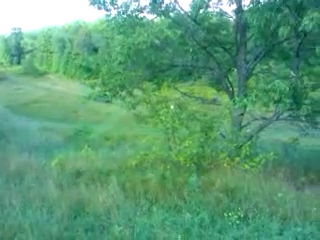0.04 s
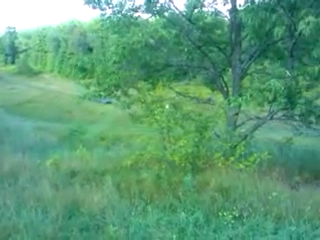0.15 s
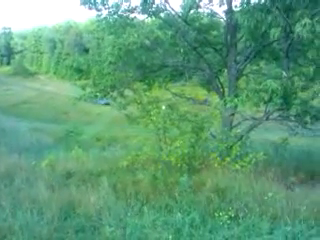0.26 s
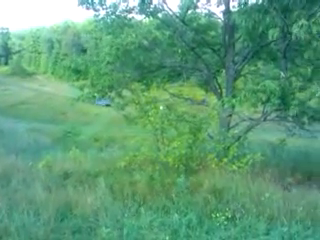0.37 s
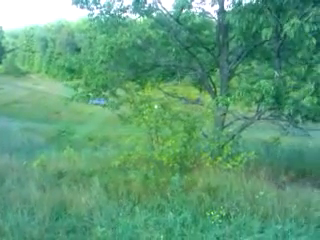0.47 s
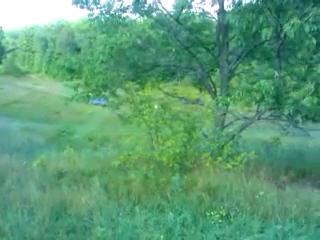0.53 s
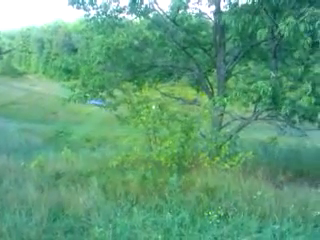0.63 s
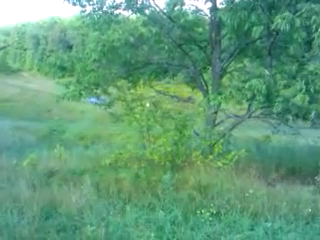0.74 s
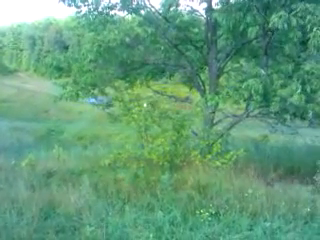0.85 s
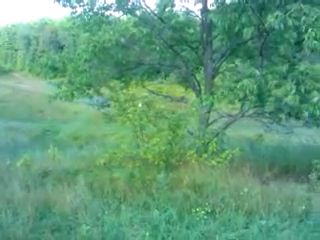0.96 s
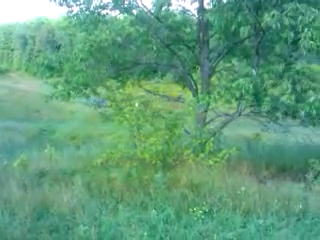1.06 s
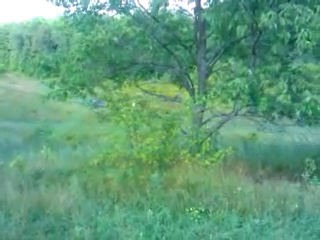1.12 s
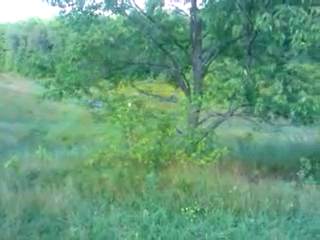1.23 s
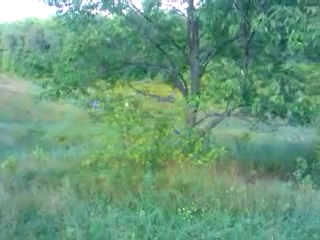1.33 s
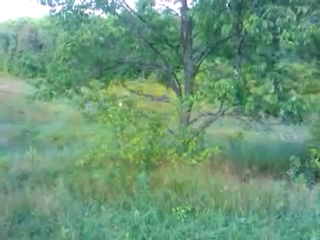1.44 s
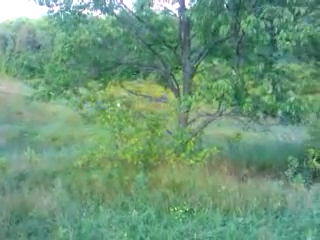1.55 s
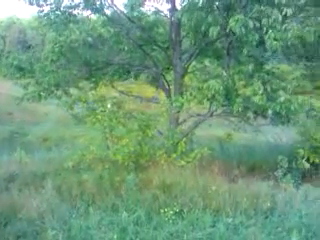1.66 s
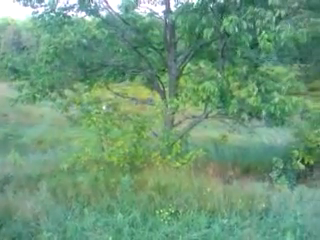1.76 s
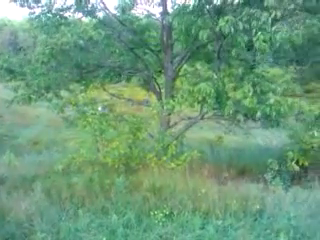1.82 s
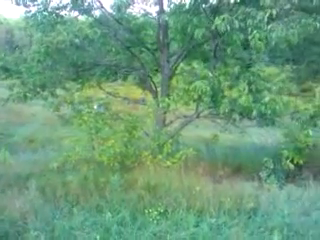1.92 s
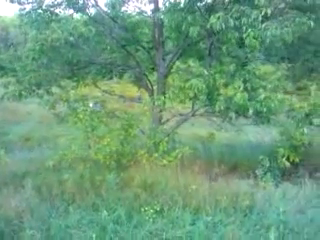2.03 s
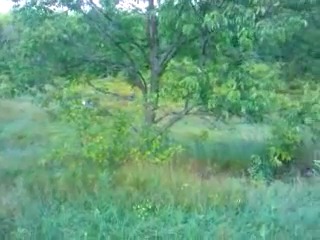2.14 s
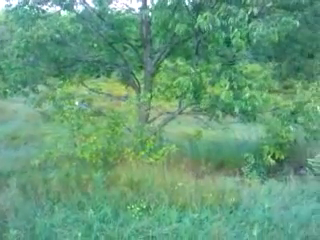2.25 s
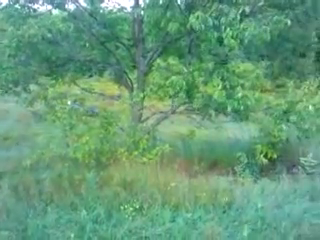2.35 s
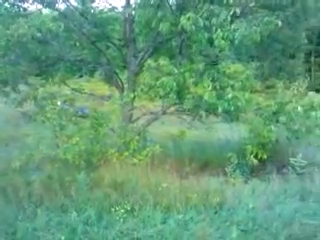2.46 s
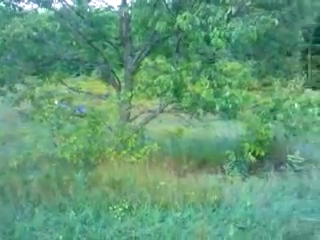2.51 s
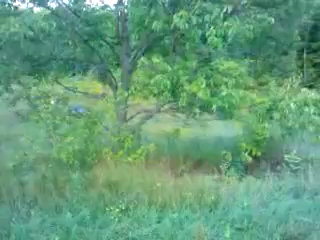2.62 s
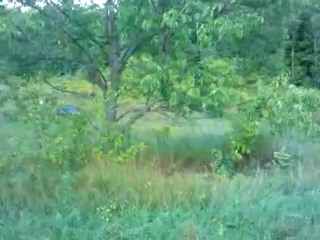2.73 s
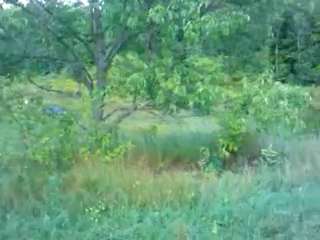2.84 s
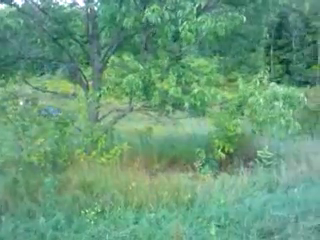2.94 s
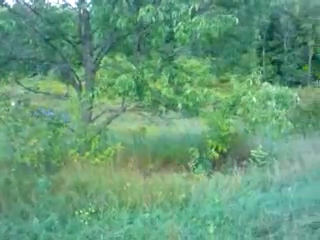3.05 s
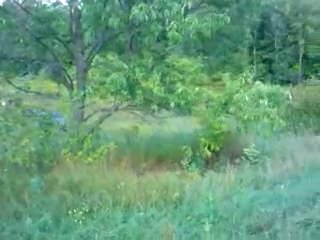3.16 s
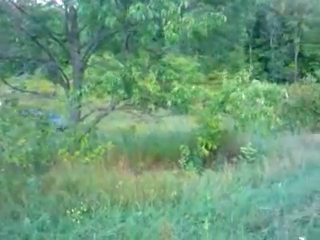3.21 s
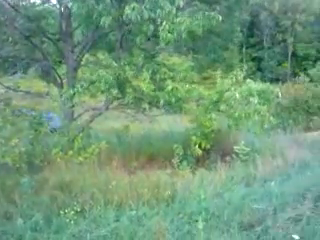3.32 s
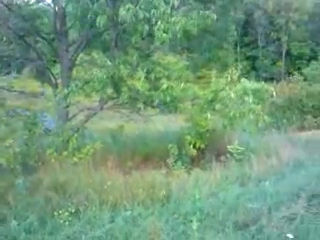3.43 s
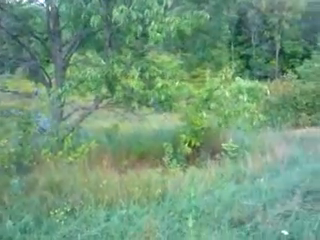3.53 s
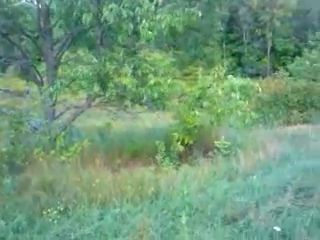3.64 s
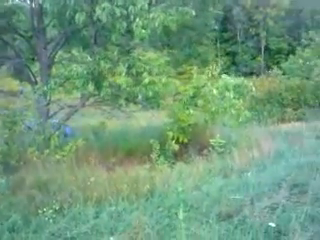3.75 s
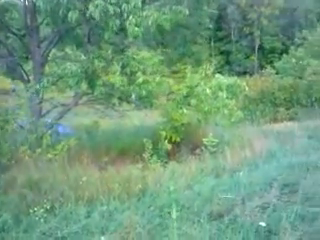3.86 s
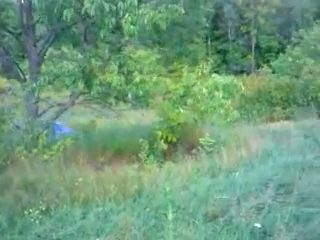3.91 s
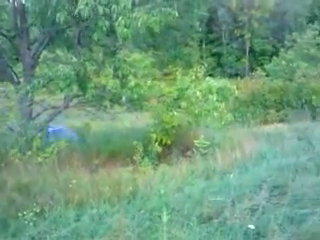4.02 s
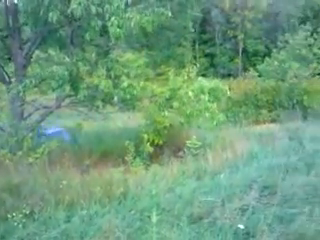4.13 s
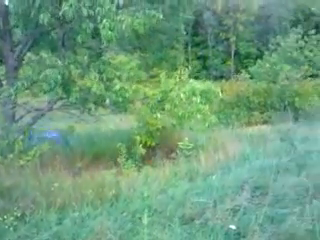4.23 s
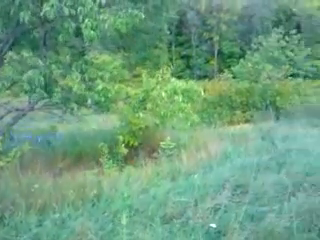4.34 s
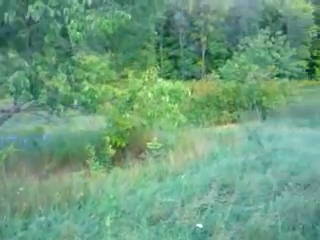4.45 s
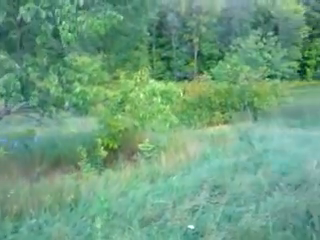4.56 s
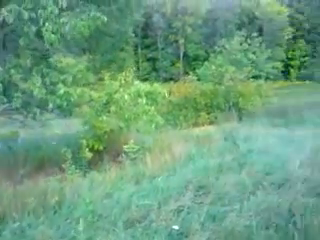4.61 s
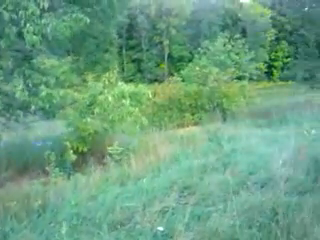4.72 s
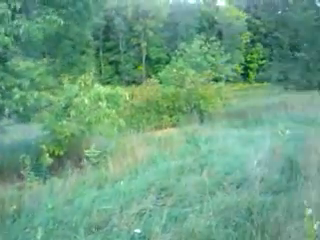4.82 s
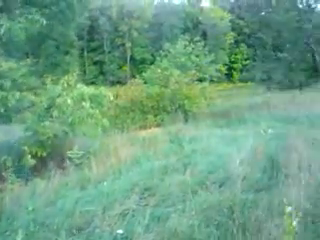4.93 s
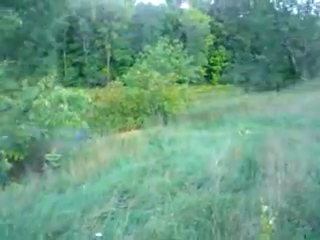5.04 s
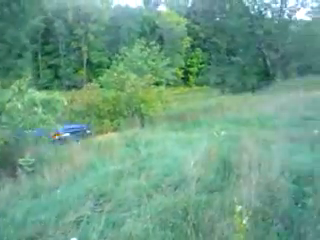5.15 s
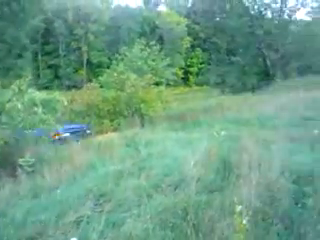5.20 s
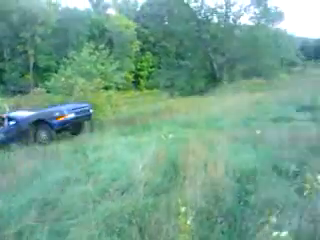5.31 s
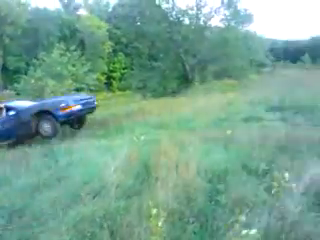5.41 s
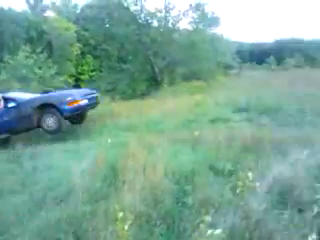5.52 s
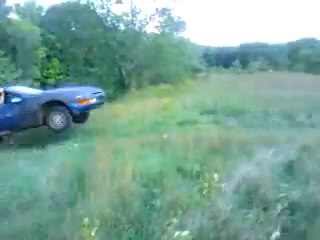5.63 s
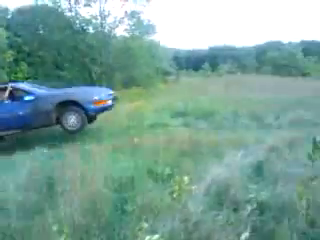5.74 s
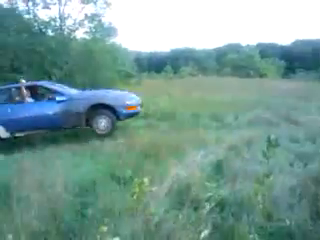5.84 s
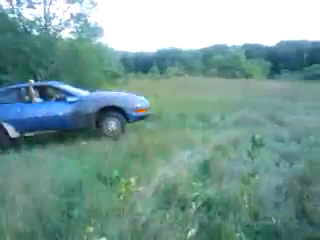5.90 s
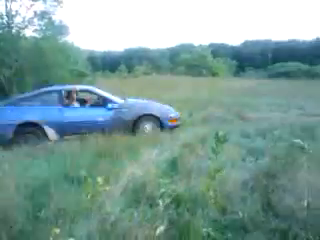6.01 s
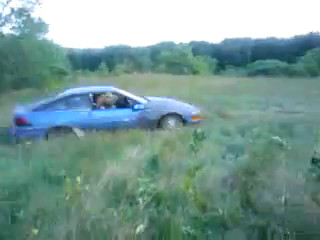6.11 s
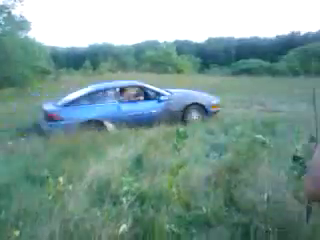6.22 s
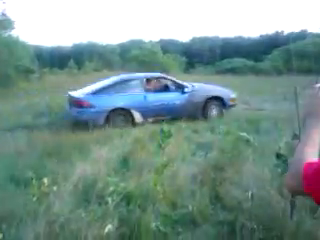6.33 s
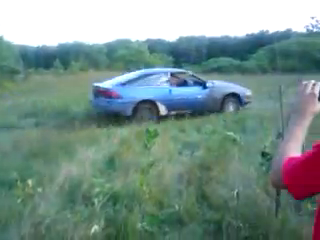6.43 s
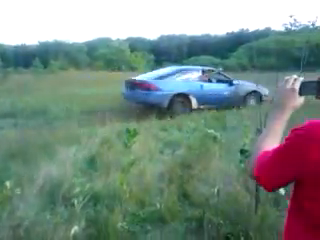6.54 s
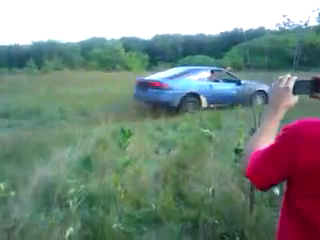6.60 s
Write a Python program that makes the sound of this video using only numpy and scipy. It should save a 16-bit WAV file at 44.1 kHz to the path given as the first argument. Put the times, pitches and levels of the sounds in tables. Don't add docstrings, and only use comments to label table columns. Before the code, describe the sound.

A small leaky-exhaust car revs far off across a windy field, lifts briefly, then roars past close, rasping and crackling until the microphone clips.

```python
import sys
import numpy as np
from scipy import signal
from scipy.io import wavfile
from scipy.ndimage import uniform_filter1d

SR = 44100
rng = np.random.default_rng(int(sys.argv[2]) if len(sys.argv) > 2 else 0)


def boost(x):
    u = np.asarray(x, float) / 20
    return 10 ** u


def output_pcm(signal):
    pcm = np.clip(np.atleast_2d(signal).T, -1, 1) * 32767
    wavfile.write(sys.argv[1], SR, np.round(pcm).astype(np.int16))


N = 294096

# press in seconds, lift in seconds.
PEDAL_PUSHES = [
    (1.81, 2.027),
    (2.085, 2.165),
    (2.472, 3.915),
    (4.13, 6.7),
]
# time in seconds, twice the firing rate in Hz.
ENGINE_SPEED = [(1.75, 165), (1.95, 190), (3.1, 188), (3.88, 214), (4.15, 202), (4.27, 232), (4.42, 216),
                (4.6, 232), (4.73, 215), (4.86, 230), (5.2, 248), (5.5, 211), (5.85, 332), (6.04, 374),
                (6.1, 359), (6.29, 344), (6.42, 266), (6.67, 302)]
CYLINDER_LEVELS = [-3, 1.5, -1.4, -1.5]
# time in seconds, exhaust rasp at full throttle in dB.
NEARNESS = [(1.4, -34.5), (1.88, -22.5), (2.02, -32.5), (2.15, -24.5), (2.6, -21.5), (3.2, -24.5),
            (3.8, -20), (4.2, -22), (4.44, -20.5), (4.8, -28), (5.17, -14), (5.45, -12.5), (5.67, -5),
            (6.0, -4), (6.07, -13), (6.27, -13), (6.44, -23.5), (6.67, -33.5)]
# frequency in Hz, level in dB per Hz.
RASP_SPECTRUM = [(530, -46), (900, -26), (1150, -17), (1400, -8), (1570, -5), (1850, -5), (2150, -3.5),
                 (2430, -4.5), (2650, -12), (3300, -16.5), (3700, -28.5), (4100, -59), (4500, -39.5),
                 (5850, -80), (9900, -120)]
# frequency in Hz, level in dB per Hz.
ROAR_SPECTRUM = [(94, -46.5), (160, -15.5), (194, -13.5), (238, -9), (753, -3), (892, -11.5), (1100, -5),
                 (1430, 0.5), (2420, -120)]
# time in seconds, level added to the roar in dB.
TAILPIPE_FACING = [(1.41, 8.5), (1.5, 2), (1.7, -4.5), (2.0, 3.5), (2.3, -3.5), (2.6, -3), (3.1, 1),
                   (4.4, -2), (5.12, 3), (5.4, 0), (5.7, 1.5), (6.06, 0.5), (6.1, 13), (6.25, 5.5),
                   (6.45, 12.5), (6.67, 11.5)]
# time in seconds, top resonance in Hz, its level in dB,
# low flank in dB, tilt in dB per octave.
GROUND_PATH = [(0, 3230, 1, 9, 7), (1.7, 3190, 0, 0.5, -8), (2.12, 2900, 1.5, 2.5, -3.5),
               (2.6, 2860, -5.5, 2, -7.5), (2.9, 2960, 7.5, 1.5, -9), (3.2, 3160, 5.5, 8.5, -2.5),
               (3.9, 3235, 5, -2, -8), (4.6, 3140, 5.5, -7, -3.5), (5.1, 3270, 0.5, -2, 2),
               (5.4, 3164, 7, -7, -6.5), (5.9, 3400, 8.5, 7.5, -1.5), (6.2, 2875, 3, 5.5, -3),
               (6.67, 2650, 8.5, 8, -6.5)]
# time in seconds, level in dB.
FAR_DRONE = [(0, -66), (.55, -64), (.8, -68.5), (1.4, -63.5), (1.5, -75.5), (6.67, -93)]
# multiple of firing rate, level in dB.
FAR_ORDERS = [(3, 0), (4, -2), (5, -6.5), (6, 0), (7, -0.5), (8, -4.5)]
# multiple of firing rate, level in dB.
BETWEEN_ORDERS = [(1.5, -6), (1.75, 0), (2.25, -14)]
# start in seconds, end in seconds, level in dB.
PIPE_BOOMS = [(2.7, 2.78, -55), (3.02, 3.45, -52), (3.45, 3.9, -50), (4.15, 4.35, -44.5),
              (4.21, 4.3, -39.5), (4.43, 4.76, -42), (4.53, 4.65, -42.5), (4.75, 5.03, -34),
              (5.215, 5.58, -31.5), (5.63, 5.72, -29.5), (5.78, 5.92, -35.5), (6.06, 6.18, -27),
              (6.19, 6.35, -19), (6.47, 6.65, -30)]
# start in seconds, end in seconds, level in dB.
TOP_REV_HOWL = [
    (5.792, 6.086, -23),
]
# start in seconds, end in seconds, level in dB.
TAIL_THROB = [
    (6.066, 6.174, -29),
    (6.159, 6.286, -21.5),
    (6.465, 6.66, -41),
]
# time in seconds, rumble in dB.
LOW_RUMBLE = [(0, -50), (.45, -50.5), (1.6, -59.5), (2.6, -55.5), (4.3, -48), (5.14, -47.5), (5.3, -37.5),
              (6.08, -44.5), (6.67, -45)]
# start in seconds, end in seconds, level in dB.
RUMBLE_SWELLS = [
    (4.91, 4.95, -45),
    (5.3, 5.32, -36),
    (5.45, 5.49, -32.5),
    (5.63, 5.68, -32),
    (6.13, 6.37, -37),
]
# frequency in Hz, level in dB per Hz.
FIELD_SPECTRUM = [(290, -30), (500, -9.5), (965, -7), (1250, 6.5), (2090, 0), (2820, -13.5), (3370, -8.5),
                  (4300, -39), (5590, -66), (9460, -120)]
# start in seconds, end in seconds, level in dB.
WIND_FLUTTER = [
    (.04, .07, -43.5),
    (.115, .15, -43),
    (.18, .32, -52.5),
    (.33, .56, -43),
    (.63, .7, -46),
    (.72, .8, -59),
]
# time in seconds, peak in dB, frequency in Hz.
PORT_PUFFS = [(0.057, -38, 310), (0.129, -35.5, 400), (0.162, -44, 219), (0.225, -41, 270),
              (0.293, -42, 335), (0.355, -41, 280), (0.374, -38, 406), (0.405, -29, 310), (0.432, -33, 310),
              (0.443, -31.5, 307), (0.477, -36, 361), (0.489, -40, 316), (0.54, -32, 305),
              (0.638, -37.5, 253), (0.666, -39, 270), (0.698, -44, 250), (1.055, -27, 290),
              (1.716, -47.5, 285), (1.747, -43, 244), (1.822, -37, 295)]
# time in seconds, peak in dB, frequency in Hz.
SHORT_BANGS = [(1.8233, -23, 1610), (1.8944, -11, 2020), (1.9351, -13, 2050), (2.1111, -19, 2540),
               (2.4857, -20, 2060), (2.5088, -19, 1320), (2.5301, -8.5, 2100), (2.5531, -13, 1980),
               (2.5745, -8, 1930), (2.5955, -8, 2090), (2.6379, -7.5, 2150), (2.6838, -10, 1850),
               (2.7227, -4.5, 2140), (2.7444, -10, 1830), (2.7776, -7.5, 1840), (2.8524, -6.5, 1980),
               (2.8949, -11, 2050), (2.9813, -9.5, 1830), (3.021, -10.5, 1570), (3.1911, -12, 1580),
               (3.356, -10.5, 1920), (3.3992, -8.5, 2370), (3.8594, -14, 2400), (4.1435, -22, 2240),
               (4.1747, -23, 1580), (4.4004, 0, 2180), (4.5086, -8.5, 2180), (4.5444, -5, 2180),
               (4.5625, -6.5, 1570), (4.7222, -13, 1680),
               (5.035, -7, 2390), (5.264, 0, 1592), (5.2804, 0.5, 1576), (5.3674, -9, 2130),
               (5.424, 1.5, 2350), (5.432, 1.5, 1716), (5.4493, 0.5, 2294), (5.4861, -4.5, 1510),
               (5.5098, -2, 1503), (5.517, -2.5, 1740), (5.5336, -2.5, 1707), (5.5519, 3, 1780),
               (6.0408, -10, 2004), (6.061, 3.5, 1564), (6.093, 0.5, 1520), (6.1126, 1, 2050),
               (6.128, -3.5, 2022), (6.159, -2, 1396), (6.1951, -3, 1930), (6.204, -2, 1426),
               (6.224, 0.5, 1360), (6.251, -2, 1890), (6.267, -7.5, 1890), (6.2957, 1.5, 1793),
               (6.398, -4.5, 1870)]


def rms_one(x):
    return x / np.sqrt(np.mean(x ** 2) + 1e-20)


def in_time(rows):
    seconds, *columns = np.transpose(rows)
    return [np.interp(np.arange(N) / SR, seconds, column) for column in columns]


def held(rows, rise_s, fall_s):
    t = np.arange(N) / SR
    total = 0
    for start, end, db in rows:
        rising = (t - start) / rise_s
        falling = 1 + (end - t) / fall_s
        total = total + boost(db) * np.clip(np.minimum(rising, falling), 0, 1)
    return total


def drift(rate):
    r = np.exp(-80 * np.pi * rate / SR)
    slow = signal.lfilter([1], [1, -2 * r, r * r], rng.standard_normal(N // 40 + 2002))[2000:]
    return np.interp(np.arange(N) / 40, np.arange(len(slow)), rms_one(slow))


def coloured(gate, spectrum, octaves, patchy_db, patch_rate, path=lambda hz: 0):
    hz, level_db = np.transpose(spectrum)
    edges = hz[1] * .8 * 2 ** np.arange(0, np.log2(hz[-2] / hz[1]), octaves)
    white = gate * rng.standard_normal((2, N))
    out = 0
    for k, (low, high) in enumerate(zip(edges, edges[1:])):
        sos = signal.butter(2, [low, high], "band", fs=SR, output="sos")
        band = signal.sosfilt(sos, white[k % 2])
        mid = np.sqrt(low * high)
        level = np.interp(np.log(mid), np.log(hz), level_db)
        out = out + band * boost(level + path(mid) + patchy_db * drift(patch_rate))
    return rms_one(out)


def lumpy(low_hz, high_hz, lump_db, rate):
    noise = boost(lump_db * drift(rate)) * rng.standard_normal(N)
    return rms_one(signal.sosfilt(signal.butter(3, [low_hz, high_hz], "band", fs=SR, output="sos"), noise))


def damped_bursts(events, rise_s, fall_s, trim_db):
    out, t = np.zeros(N + 2000), np.arange(2000) / SR
    shape = (1 - np.exp(-t / rise_s)) * np.exp(-t / fall_s)
    shape = shape / shape.max()
    for s, db, hz in events:
        at = round(s * SR)
        out[at:at + 2000] += boost(db + trim_db) * shape * np.sin(2 * np.pi * (hz * t + rng.random()))
    return out[:N]


def pedal():
    return np.minimum(held([(*push, 0) for push in PEDAL_PUSHES], rise_s=.06, fall_s=.1), 1)


def engine_turns():
    firing_hz = in_time(ENGINE_SPEED)[0] / 2
    return np.cumsum(firing_hz * (1 + .004 * drift(12))) / SR


def firing_gate(turns, share):
    decay_s, uneven_db = .0038, 2.5
    count = np.floor(turns).astype(int)
    luck = rng.standard_normal(2000)[count]
    cylinder_db = np.array(CYLINDER_LEVELS)[count % 4]
    kicks = np.append(0, np.diff(count)) * boost(cylinder_db + uneven_db * luck)
    gas = signal.lfilter([1], [1, -np.exp(-1 / (decay_s * SR))], kicks)
    gas = gas / np.sqrt(uniform_filter1d(gas ** 2, size=4000) + 1e-9)
    share = np.clip(share, 0, 1)
    return np.sqrt(share * gas ** 2 + 1 - share)


def ground_path(top_hz, top_db, flank_db, tilt_db):
    top, width = np.log2(top_hz), .09

    def gain_db(hz):
        resonance = top_db * np.exp(-((np.log2(hz) - top) / width) ** 2)
        return resonance + flank_db * (hz < 1300) + tilt_db * np.log2(hz / 1900)
    return gain_db


def exhaust(throttle, turns):
    lift_drop_db, surge_db = 20, .88
    coast_share, load_share = .1, .45
    clear_below_db, blurred_at_db = -19, -12
    roar_coast_db, roar_load_db = -9.5, -17

    near_db, = in_time(NEARNESS)
    rasp_db = near_db - lift_drop_db * (1 - throttle) + surge_db * drift(11.4)
    nearest_db = np.maximum.accumulate(near_db)
    clear = np.clip((nearest_db - blurred_at_db) / (clear_below_db - blurred_at_db), 0, 1)
    gate = firing_gate(turns, coast_share + load_share * throttle * clear)

    path = ground_path(*in_time(GROUND_PATH))
    rasp = coloured(gate, RASP_SPECTRUM, octaves=.11, patchy_db=3.2, patch_rate=6, path=path)
    rasp = rasp / np.sqrt(uniform_filter1d(rasp ** 2, size=3000))

    roar_db = roar_coast_db + (roar_load_db - roar_coast_db) * throttle + in_time(TAILPIPE_FACING)[0]
    roar = coloured(np.sqrt(gate), ROAR_SPECTRUM, octaves=.2, patchy_db=2.5, patch_rate=11)
    return boost(rasp_db) * (rasp + boost(roar_db) * roar)


def orders(turns, table, wobble_db):
    total = 0
    for multiple, db in table:
        tone = np.sin(2 * np.pi * (multiple * turns + rng.random()))
        total = total + np.sqrt(2) * boost(db + wobble_db * drift(17)) * tone
    return total


def pipe_tones(turns):
    boom, howl, throb = (held(rows, rise_s=.042, fall_s=.05) for rows in (PIPE_BOOMS, TOP_REV_HOWL, TAIL_THROB))
    families = [
        (boost(in_time(FAR_DRONE)[0]), FAR_ORDERS),
        (boom, [(2, 0)]),
        (boost(-14.5) * boom + throb, BETWEEN_ORDERS),
        (boost(-13) * boom, [(3, 0), (5, 0)]),
        (boost(-19) * boom + howl, [(4, 0)]),
    ]
    return sum(gain * orders(turns, family, wobble_db=1.6) for gain, family in families)


def low_rumble(throttle):
    lift_drop_db = 16
    shake = boost(in_time(LOW_RUMBLE)[0] - lift_drop_db * (1 - throttle))
    shake = shake + held(RUMBLE_SWELLS, rise_s=.079, fall_s=.045)
    return shake * lumpy(63, 170, lump_db=2, rate=9.9)


def field_hush():
    return boost(-50) * coloured(1, FIELD_SPECTRUM, octaves=.21, patchy_db=2.6, patch_rate=9)


def wind_on_microphone():
    flutter = held(WIND_FLUTTER, rise_s=.02, fall_s=.03) * boost(-5.5) * lumpy(200, 420, lump_db=2.5, rate=30)
    puffs = damped_bursts(PORT_PUFFS, rise_s=.004, fall_s=.0028, trim_db=2)
    return flutter + signal.sosfilt(signal.butter(3, 170, "high", fs=SR, output="sos"), puffs)


def short_bangs():
    return damped_bursts(SHORT_BANGS, rise_s=.0005, fall_s=.0035, trim_db=-4)


def scene():
    throttle, turns = pedal(), engine_turns()
    car = exhaust(throttle, turns) + pipe_tones(turns) + low_rumble(throttle) + short_bangs()
    return (car + field_hush() + wind_on_microphone())[None]


def band_limit(x):
    return signal.sosfilt(signal.butter(12, 15780, fs=SR, output="sos"), x)


def record(dry):
    preamp_top, overload = 1.18, .712
    rounded = preamp_top * np.tanh(dry / preamp_top)
    slope = signal.butter(16, 4120, fs=SR, output="sos")
    wall = signal.ellip(8, .5, 70, 4520, fs=SR, output="sos")
    narrow = signal.sosfilt(np.vstack([slope, wall]), rounded)
    narrow = narrow * np.minimum(np.arange(N)[::-1] / 30, 1)
    return band_limit(np.clip(narrow, -overload, overload))


dry = scene()
out = record(dry)
output_pcm(out)
```